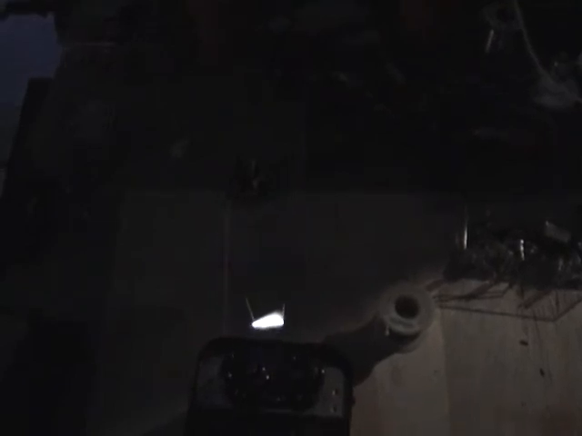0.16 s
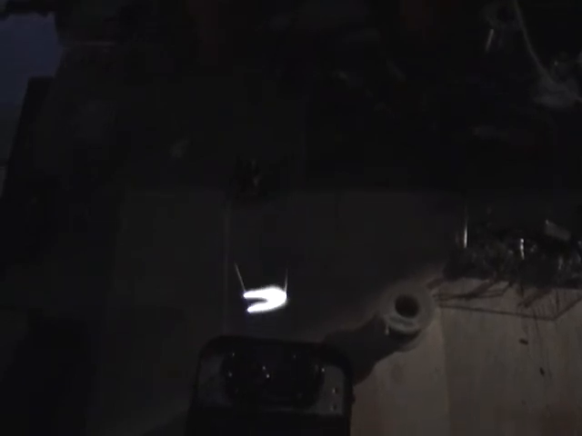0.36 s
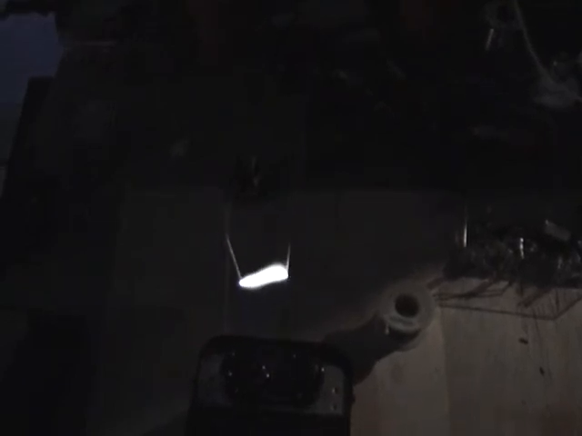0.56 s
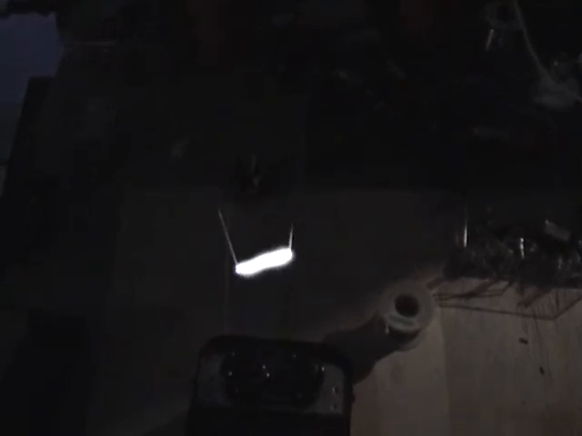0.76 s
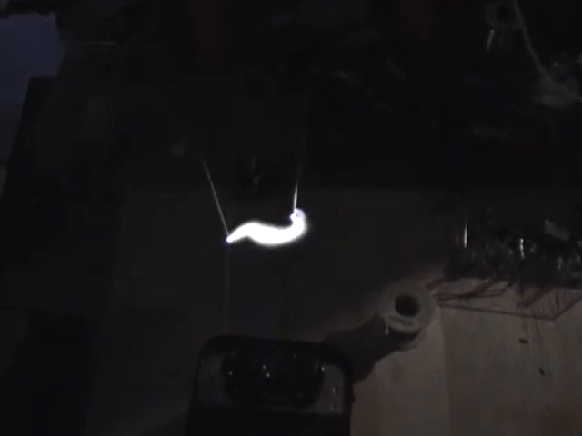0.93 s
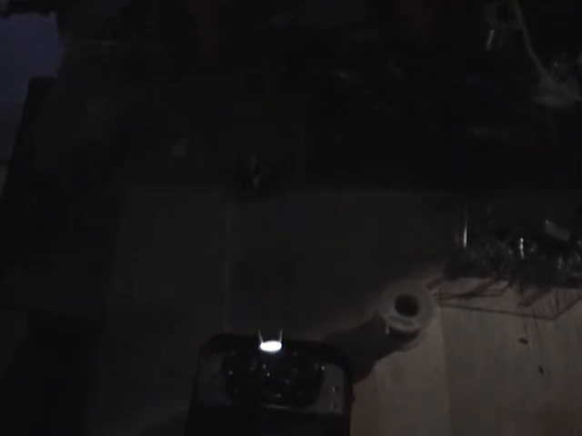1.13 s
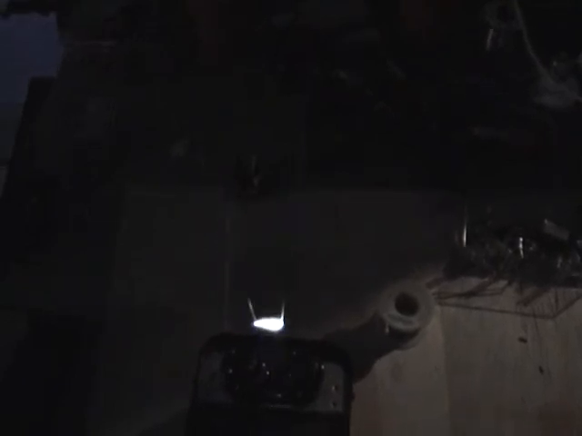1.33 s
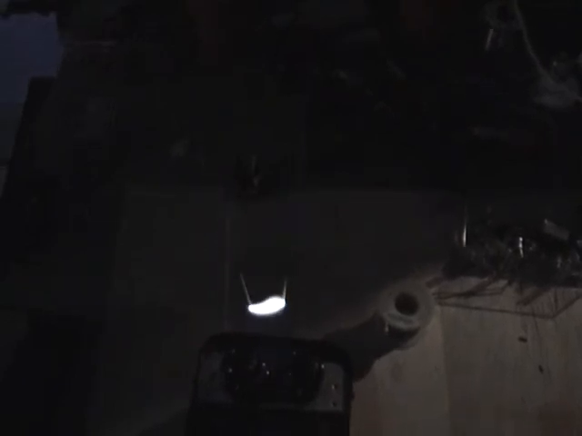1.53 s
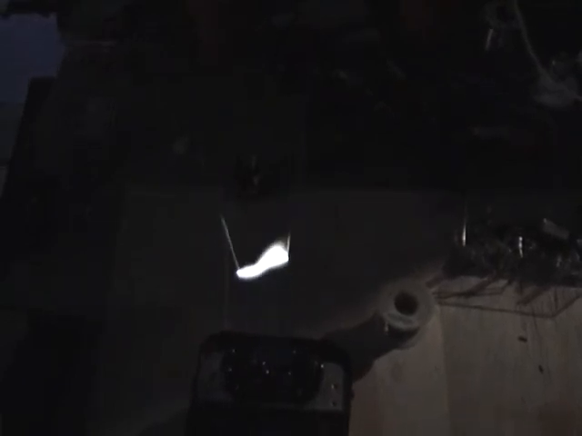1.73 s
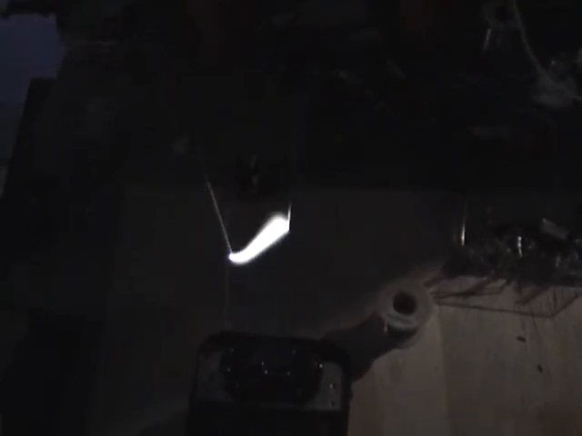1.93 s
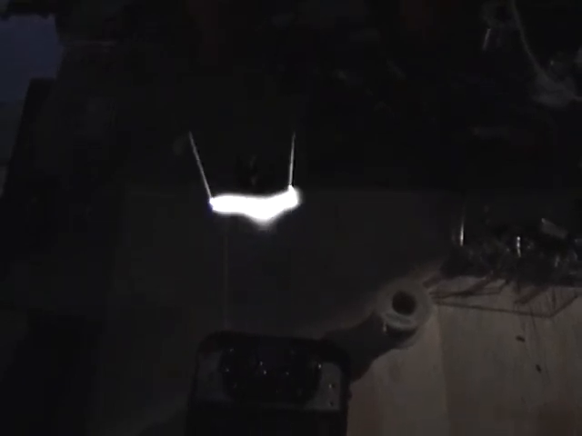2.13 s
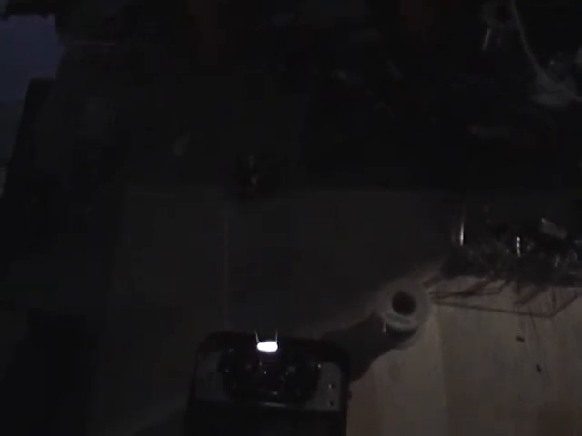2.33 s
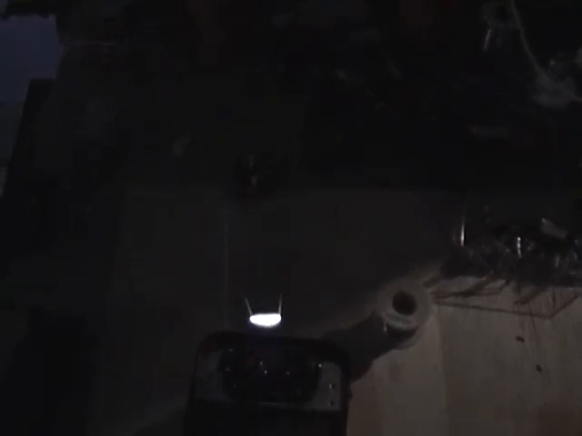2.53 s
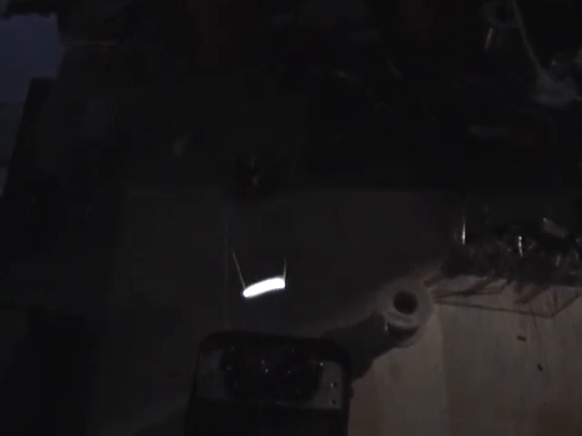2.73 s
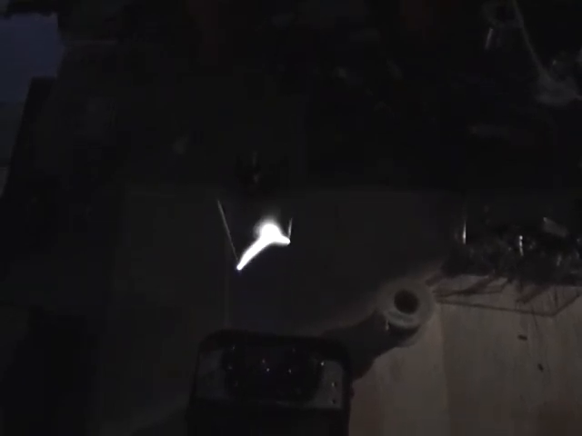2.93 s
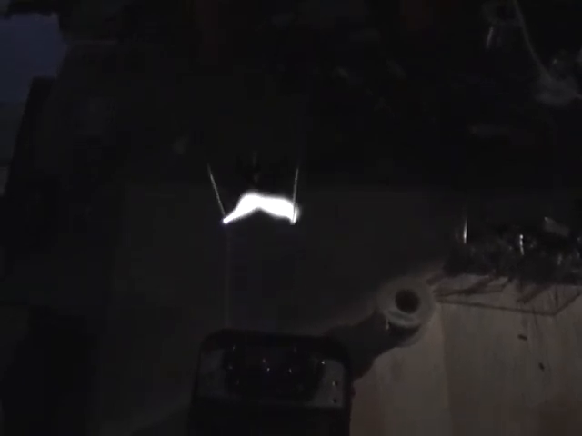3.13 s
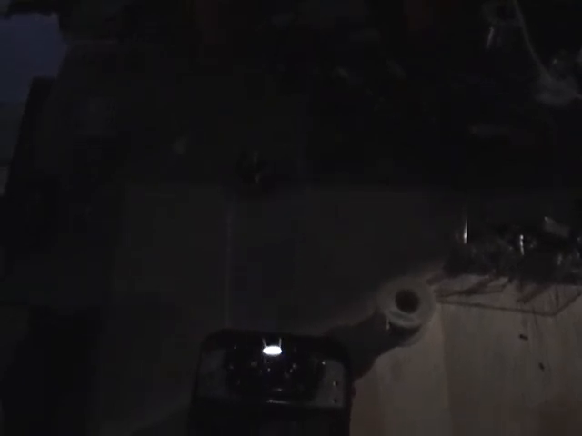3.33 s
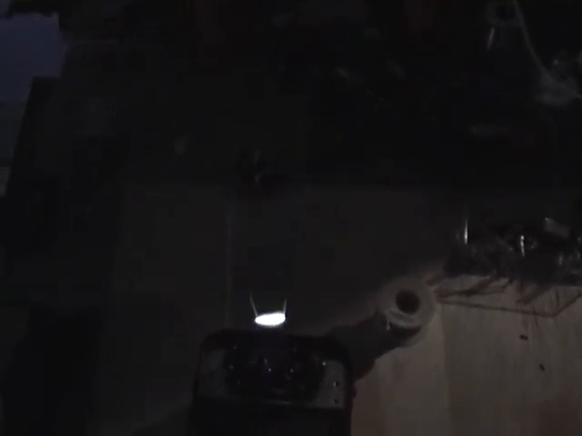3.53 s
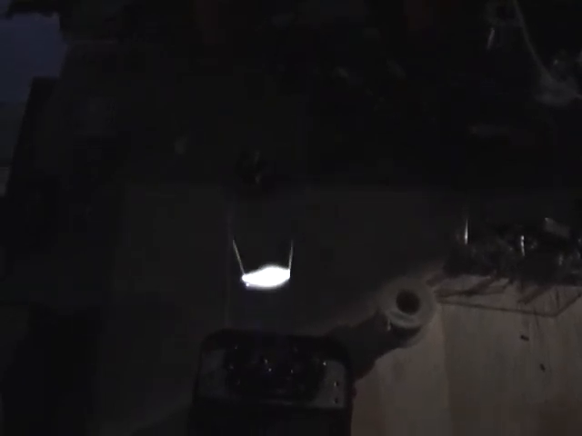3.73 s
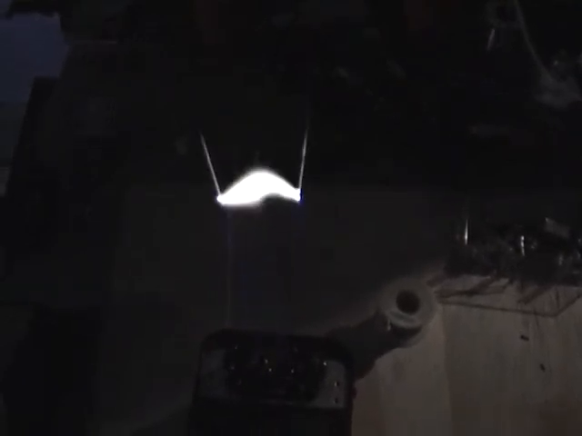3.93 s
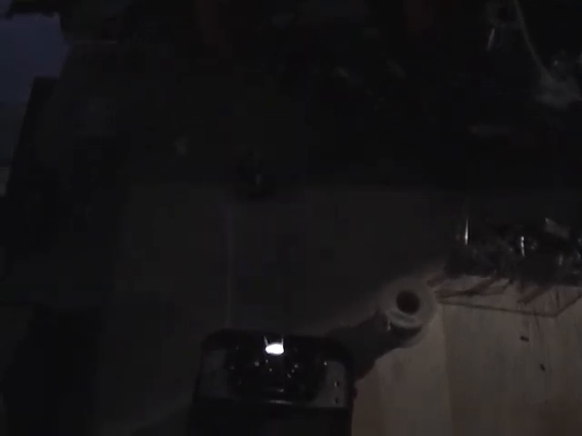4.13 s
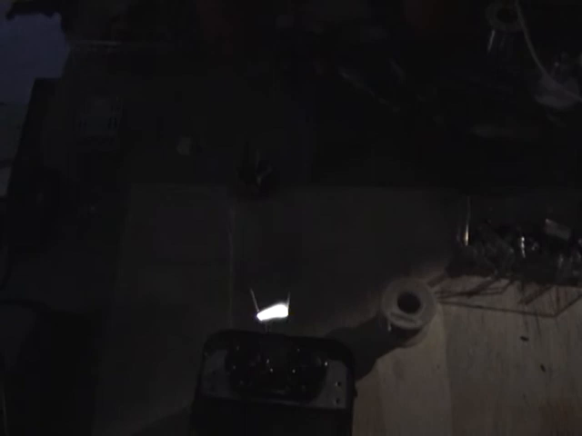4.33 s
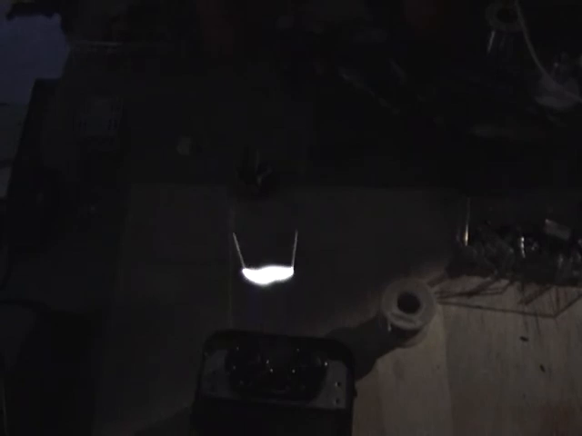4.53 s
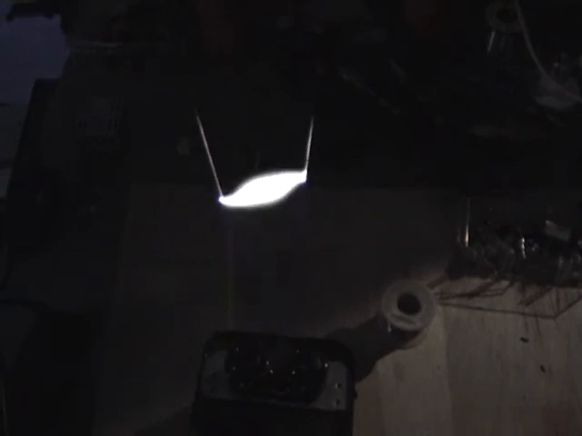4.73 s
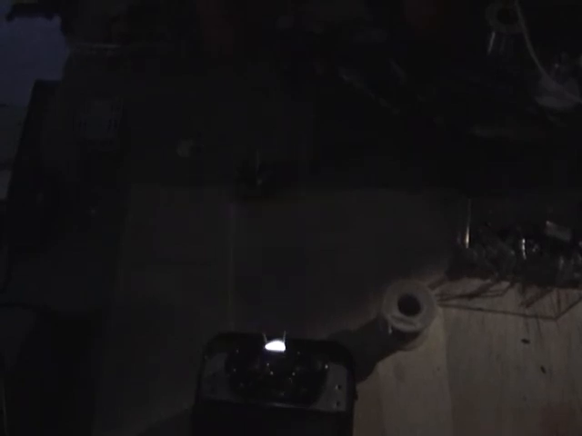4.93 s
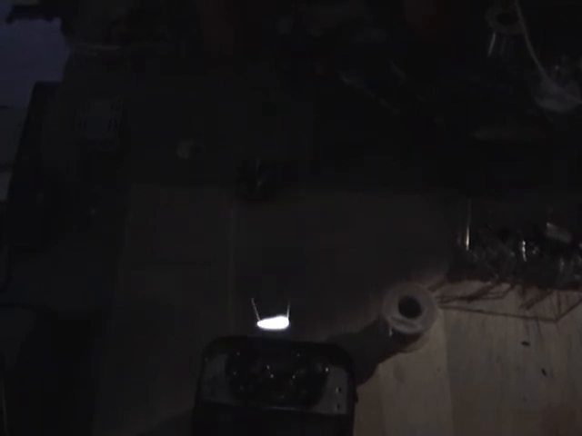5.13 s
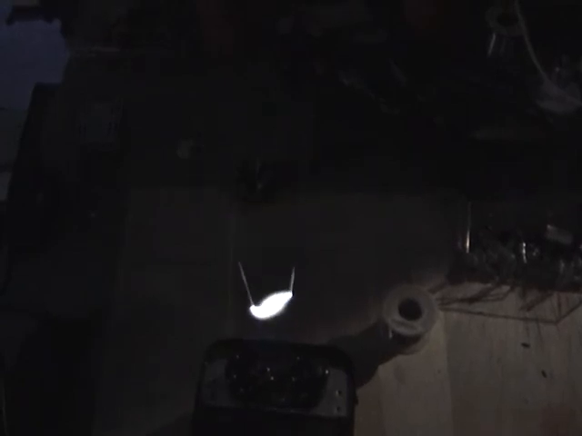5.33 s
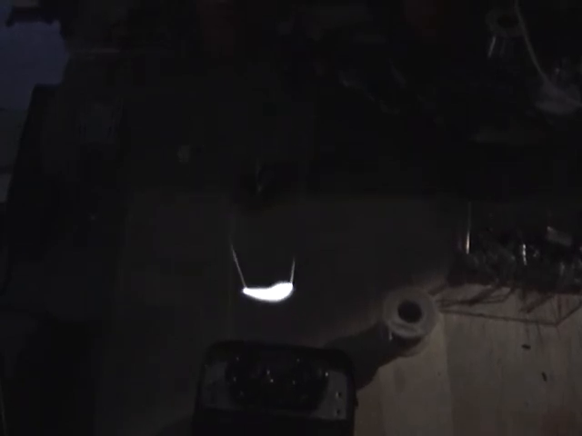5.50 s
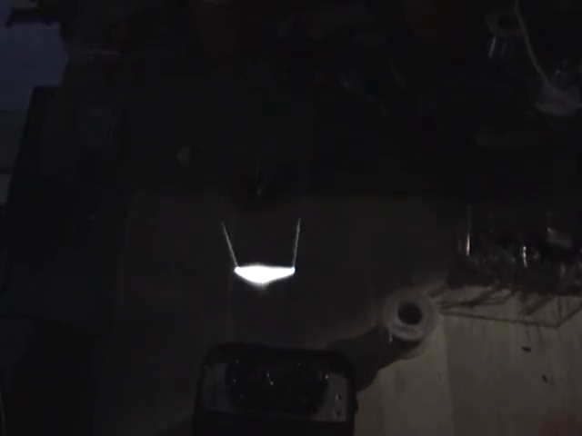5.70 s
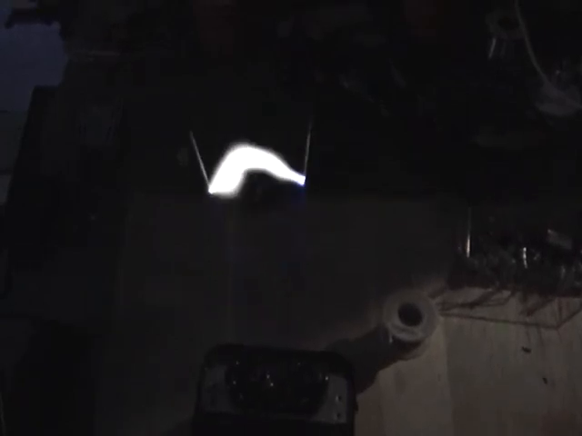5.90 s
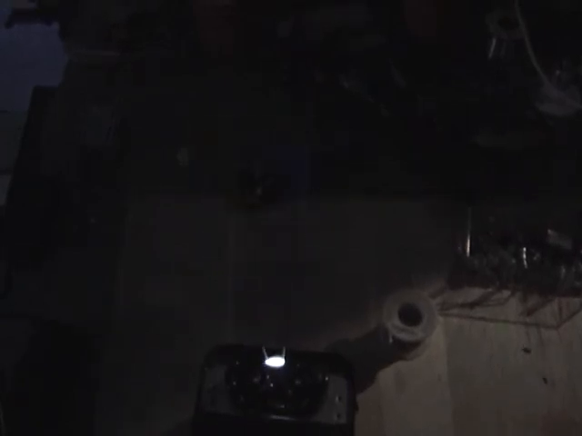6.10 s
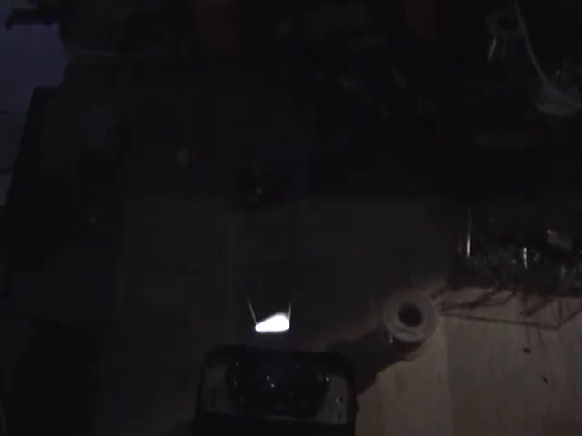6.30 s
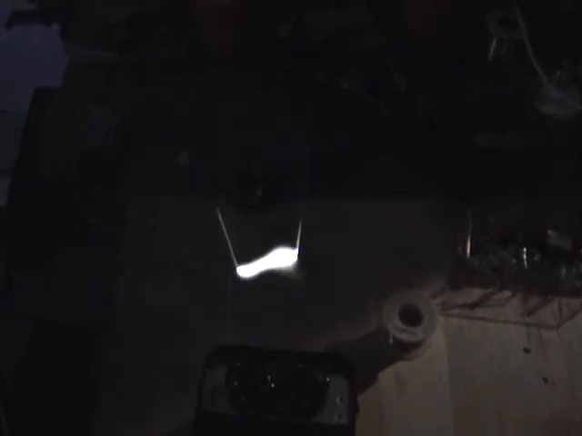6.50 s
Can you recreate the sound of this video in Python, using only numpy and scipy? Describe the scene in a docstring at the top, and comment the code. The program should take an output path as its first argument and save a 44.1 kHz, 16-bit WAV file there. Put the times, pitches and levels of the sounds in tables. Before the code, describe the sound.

Close by in a small, dry-sounding workshop, a transformer hums and a fan softly moves air while an electric arc buzzes up a pair of metal rods. Each climb starts thin and bright, sweeps into a rougher sizzle and ends in a sharp snap as the arc strikes again. The cycle repeats about once a second, with the loudest sputtering cracks midway and near the end.

```python
"""A small workshop, where a mains-fed arc climbs again and again between two diverging rods.
It re-ignites on every half cycle, heating the air in a tiny thunderclap; the echoes off the bench slide
as it rises, so the buzz sweeps. Near the top it flares, tears off and snaps back to the narrow gap.
The transformer hums and air rushes underneath; a gain control ducks everything after loud treble peaks."""
import sys
import numpy as np
from scipy import signal
from scipy.fft import rfft, irfft, next_fast_len
from scipy.io import wavfile
from scipy.ndimage import uniform_filter1d

SR = 44100
rng = np.random.default_rng(int(sys.argv[2]) if len(sys.argv) > 2 else 0)


def master_out(mix):
    """Clip the mix to full scale and print it as 16-bit PCM to the path in sys.argv[1]."""
    frames = np.transpose(np.atleast_2d(mix))
    ceiling = np.clip(frames, -1, 1)
    pcm = np.round(ceiling * 32767).astype(np.int16)
    wavfile.write(sys.argv[1], SR, pcm)


N = 289296
STRIKE_HZ, FIRST_STRIKE_S = 119.988, .00409  # two strikes per mains cycle
SOUND_CM_S = 34300
PULSE_SAMPLES = 512
TIME = np.arange(N) / SR
AGE = np.arange(PULSE_SAMPLES) / SR
BIN_HZ = np.arange(PULSE_SAMPLES // 2 + 1) * SR / PULSE_SAMPLES

# Climbs from the narrow gap: start t/s, snap level/dB, rising speed/(cm/s), recording level/dB
# (buzz and air are turned down together, a little, after some snaps)
CLIMBS = [(-.3, -10, 52.2, -0.5), (0.9439, -14, 60, 0), (2.1611, -10, 64, 0), (3.253, -12.5, 83.7, -1.5),
          (4.0443, -10.5, 83.3, -0.8), (4.777, -10.5, 69, -1.05), (5.9615, -8, 79, -0.5)]


def buzz(sputter_s=.0007, sputter_edge_hz=3200):
    """Thermal expansion: each re-ignition radiates a pressure pulse, more ragged from a longer arc."""
    # Spectrum of one strike: f/Hz, level/dB
    strike_spectrum = [(150, -16), (700, -13.5), (1900, -19), (2600, -11), (3400, -8.5), (4300, -9.5),
                       (5500, -4.5), (6500, -4.5), (7700, 1), (9000, .5), (9900, -3.5), (11500, -7.5),
                       (13000, -10.5), (16000, -18.5)]
    # A short arc cracks higher than a long one: f/Hz, level change/(dB per dB of brightness)
    brightness_tilt = [(1800, 0.35), (2800, -.5), (4000, -0.74), (6300, -0.3), (9000, 0.33), (13000, 0.7)]
    # Single loud cracks of an overstretched arc: t/s, level/dB
    cracks = [(.929, -13), (1.963, -21), (2.129, -16), (2.146, -18), (2.988, -14.5), (3.079, -11.5),
              (3.121, -14), (3.154, -17.5), (5.738, -18), (5.796, -16), (5.896, -14.5), (5.913, -13),
              (5.946, -10)]
    count = int((N / SR - FIRST_STRIKE_S) * STRIKE_HZ) + 1
    times = FIRST_STRIKE_S + np.arange(count) / STRIKE_HZ
    height, gain_db = climb(times)
    height_db, height_bright = arc_timbre(height)
    flare_db, flare_bright = flaring(times)
    flicker_db = (.06 + .0272 * height + .12 * flare_db) * rng.standard_normal(count)
    level_db = height_db + gain_db + flare_db + flicker_db
    ragged_db = -17 + .22 * height + .77 * flare_db
    for crack_s, crack_db in cracks:
        k = np.argmin(abs(times - crack_s))
        level_db[k], ragged_db[k] = crack_db, 2
    wander_cm = (.1 + .024 * height) * rng.standard_normal(count)
    polarity_cm = .66 * (-1) ** np.arange(count)  # the loud spot changes rod with the polarity
    arrivals = times - (height + wander_cm + polarity_cm) / SOUND_CM_S  # higher is heard sooner
    tilt_db = (height_bright + flare_bright)[:, None] * at_hz(brightness_tilt, BIN_HZ)
    pulse = minimum_phase(at_hz(strike_spectrum, BIN_HZ) + tilt_db)
    high_pass = (BIN_HZ / (BIN_HZ - 1j * sputter_edge_hz)) ** 2
    channel = 1 + from_db(ragged_db)[:, None] * sputter(sputter_s, count) * high_pass
    return pulse_train(pulse * channel * bench_echoes(height), arrivals, level_db)


def snaps(spark_s=.0011, spark_db=-2):
    """Dielectric breakdown: the full voltage jumps the narrow gap with a sharp front and a short spark."""
    # Spectrum of one snap: f/Hz, level/dB
    snap_spectrum = [(150, 1), (1100, -4), (3000, -4.5), (5000, -1), (7300, 7), (10500, -1), (13000, -5),
                     (16000, -27)]
    times, level_db = np.transpose([row[:2] for row in CLIMBS if row[0] > 0])
    front = minimum_phase(at_hz(snap_spectrum, BIN_HZ))
    spark = 1 + from_db(spark_db) * sputter(spark_s, len(times))
    return pulse_train(front * spark * bench_echoes(np.zeros(len(times))), times, level_db)


def climb(t):
    """Buoyancy: hot air lifts the arc, except where it lingers. Gives height/cm, recording level/dB."""
    # The arc lingers on the rods: middle t/s, half duration/s, fraction of speed lost
    stalls = [(.568, 0.14, 0.8), (1.788, .24, .74), (2.938, 0.192, .56), (5.527, 0.29, 0.57)]
    start, _, speed, gain_db = np.transpose(CLIMBS)
    k = np.maximum(np.searchsorted(start, t) - 1, 0)
    lost_s = sum(share * half * (np.tanh((t - middle) / half) - np.tanh((start[k] - middle) / half))
                 for middle, half, share in stalls)
    return np.maximum(speed[k] * (t - start[k] - lost_s), 0), gain_db[k]


def arc_timbre(height):
    """Source size: the arc lengthens as it rises, which changes its level and dulls its crack."""
    # The arc along the rods: height/cm, level/dB, brightness/dB
    arc_profile = [(0, -36, 15), (4, -29, 9), (12.1, -26.5, 11), (17.2, -24.5, 7), (20, -29, 1),
                   (35, -28.5, -1.5), (43.6, -27, -4.5), (51.5, -24.5, -4), (62, -25, -7)]
    cm, level_db, bright_db = np.transpose(arc_profile)
    return np.interp(height, cm, level_db), np.interp(height, cm, bright_db)


def flaring(t):
    """Amplitude modulation: the arc bows out and roars in flares that swell, hold and die."""
    # Flares: middle t/s, half duration/s, added level/dB, added brightness/dB
    flares = [(0.5, .015, 3, 0), (.61, 0.019, 2.5, -2), (0.886, 0.056, 1.5, -2.5), (1.883, 0.023, 3, -1),
              (2, 0.032, 1, 3.5), (2.096, 0.045, 2.5, 4), (2.918, 0.031, 7, -2), (3.053, 0.084, 10, 6),
              (3.236, .02, 5, -3.5), (3.91, 0.036, 1.5, 2), (4.567, 0.021, 6, 7), (4.782, 0.016, 6.5, -5),
              (5.338, 0.022, 3.5, -3), (5.611, 0.021, 5, -4), (5.826, 0.08, 6, 3.5)]
    middle, half, level_db, bright_db = np.transpose(flares)
    envelope = np.exp(-((t[:, None] - middle) / half) ** 4)
    return envelope @ level_db, envelope @ bright_db


def sputter(length_s, count):
    """Path differences along a crooked channel spread its sound in time: unit-energy burst spectra."""
    bursts = rng.standard_normal((count, PULSE_SAMPLES)) * np.exp(-(AGE / length_s) ** 2)
    return rfft(bursts / np.sqrt(np.sum(bursts ** 2, axis=1, keepdims=True)))


def minimum_phase(level_db):
    """Causality: a spectrum with these levels, phased so that nothing sounds before the strike."""
    cepstrum = irfft(np.log(from_db(level_db)))
    fold = 1 + np.sign(PULSE_SAMPLES / 2 - np.arange(PULSE_SAMPLES)) * (AGE > 0)
    return np.exp(rfft(cepstrum * fold))


def pulse_train(spectra, times, level_db):
    """Superposition of stereo pulses; each level is the rms over one half cycle."""
    start = np.floor(times * SR).astype(int)
    waves = irfft(spectra * np.exp(-2j * np.pi * BIN_HZ * (times - start / SR)[:, None]))
    energy = np.sum(waves.mean(axis=0) ** 2, axis=1)
    waves = waves * (from_db(level_db) * np.sqrt(SR / STRIKE_HZ / energy))[:, None]
    samples = np.maximum(start[:, None] + np.arange(PULSE_SAMPLES), 0).ravel()
    return np.array([np.bincount(samples, side.ravel(), N)[:N] for side in waves])


def bench_echoes(height, side_lag_s=2.2e-6):
    """Comb filtering: direct sound interferes with echoes whose delays grow as the arc rises."""
    # Nearby surfaces: delay at the gap/ms, path growth/(cm/cm), signed strength,
    # fading height/cm, lower edge f/Hz
    reflectors = [(.272, .745, 1.05, 18.5, 3800), (.163, 0.22, .3, 18, 8760),
                  (.367, 0.716, -0.19, 26, 2200), (.438, 0.291, 0.23, 120, 600),
                  (.583, 0.73, 0.33, 31.5, 600), (.761, 0.29, .14, 120, 600), (.968, 0.924, 0.29, 63, 600),
                  (.996, 0.28, -0.036, 120, 600), (2.394, 1.231, -0.24, 76, 600)]
    paths = np.ones((2, len(height), len(BIN_HZ)), complex)
    for k, (gap_ms, slide, strength, reach_cm, edge_hz) in enumerate(reflectors):
        delay = detour_s(gap_ms, slide, height)
        lag = (-1) ** k * side_lag_s * np.array([1, -1])
        gain = strength / np.sqrt(1 + (height / reach_cm) ** 8)
        treble = BIN_HZ ** 2 / np.hypot(BIN_HZ ** 2, edge_hz ** 2)  # small surfaces mirror short waves
        echo = gain[:, None] * treble * np.exp(-2j * np.pi * BIN_HZ * delay[:, None])
        paths += echo * np.exp(-2j * np.pi * BIN_HZ * lag[:, None, None])
    return paths + clutter(height)


def clutter(height, level_db=-12, spread_ms=1.5, edge_hz=3000, width=.62, count=20):
    """Scattering: small things near the bench return weak treble echoes that slide with the arc."""
    paths = 0
    for late, slide, sign, pan in rng.random((count, 4)):
        gap_ms = .8 - spread_ms * np.log(1 - .95 * late)
        delay = detour_s(gap_ms, .4 + .9 * slide, height)
        gains = np.sign(sign - .5) * (1 + width * np.sign(pan - .5) * np.array([1, -1]))
        paths = paths + gains[:, None, None] * np.exp(-2j * np.pi * BIN_HZ * delay[:, None])
    return from_db(level_db) / np.sqrt(count) * paths * BIN_HZ / (BIN_HZ - 1j * edge_hz)


def detour_s(gap_ms, slide, height):
    """Path difference: an echo's delay is nearly constant for a low arc, then grows with height."""
    return np.hypot(gap_ms / 1000, slide * height / SOUND_CM_S)


def reverberation(x, t60_s=.088, onset_s=.004):
    """Diffuse reflection: the sound of a crowded room decays quickly and exponentially."""
    t = TIME[:SR // 3]
    tail = unit_rms(stereo_noise(len(t), side_db=-3) * from_db(-60 * t / t60_s) * (t > onset_s))
    wet = signal.fftconvolve(x, from_db(-14) * tail / np.sqrt(len(t)), axes=1)[:, :N]
    return coloured(wet, [(1000, 10.5), (2500, -12), (4000, 8.0), (8000, 0.5), (15000, -3.0)])


def transformer_hum(load_db=5, load_cm=18):
    """Forced vibration: the core hums at harmonics of the strike rate, hardest under a short arc."""
    # Core harmonics: multiple of the strike rate, level before loading/dB
    harmonics = [(1, -50), (2, -51.5), (3, -56.5), (4, -53), (5, -55), (6, -54), (7, -54), (8, -69)]
    height, _ = climb(TIME)
    tones = 0
    for multiple, level_db in harmonics:
        amplitude = from_db(level_db + drift(7))
        tones += amplitude * np.sin(2 * np.pi * (round(multiple) * STRIKE_HZ * TIME + rng.random()))
    return from_db(load_db * np.exp(-height / load_cm)) * tones


def air_rush(level_db=-33.5, waver_db=1.03, fan_db=-.5):
    """Flow noise: broadband air, turned down with the buzz after some snaps, and a fan's wavering tones."""
    # Spectrum of the rushing air: f/Hz, relative level/dB
    air_spectrum = [(20, -19), (70, -22), (130, -7.5), (160, -12.5), (230, -2.5), (310, -2.5), (430, -3),
                    (580, -8), (850, -12), (1250, -9), (1900, -19), (4000, -21), (9000, -22),
                    (16000, -27.5)]
    # Tones of the fan: f/Hz, relative level/dB
    fan_tones = [(42.4, -61), (50, -60), (99.8, -53), (183.5, -49), (220.7, -58), (305, -42.5), (396, -43)]
    _, gain_db = climb(TIME)
    air = unit_rms(coloured(stereo_noise(N, side_db=-15), air_spectrum))
    fan = sum(from_db(db) * np.sin(2 * np.pi * hz * TIME + .9 * drift(7)) for hz, db in fan_tones)
    air_db = level_db + .84 * gain_db + waver_db * drift(12)
    return from_db(air_db) * air + from_db(fan_db) * fan


def rumble(level_db=-61):
    """Low-pass noise: a faint rumble, uncorrelated between the two sides."""
    spectrum = [(10, -14), (30, -6), (60, -6), (140, 1), (400, -31), (2000, -60)]  # f/Hz, level/dB
    return from_db(level_db) * unit_rms(coloured(rng.standard_normal((2, N)), spectrum))


def gain_control(x, threshold_db=-20.5, sense_hz=8000, release_s=.14, slope=.84):
    """Compression: treble above a threshold turns the gain down at once; it creeps back afterwards."""
    treble = signal.sosfilt(signal.butter(2, sense_hz, "high", fs=SR, output="sos"), x.mean(axis=0))
    level_db = 10 * np.log10(np.abs(uniform_filter1d(treble ** 2, size=132)) + 1e-12)
    over_db = np.maximum(level_db - threshold_db, 1e-6)
    decay = TIME / release_s
    held_db = np.exp(np.maximum.accumulate(np.log(over_db) + decay) - decay)
    return x * from_db(-slope * uniform_filter1d(held_db, size=44))


def from_db(db):
    """Amplitude ratio of a level."""
    return 10 ** (np.asarray(db) / 20)


def unit_rms(x):
    """Normalisation to unit power."""
    return x / np.sqrt(np.mean(x ** 2) + 1e-20)


def at_hz(points, hz):
    """Interpolation of a spectrum on a log-frequency axis."""
    f, value = np.transpose(points)
    return np.interp(np.log(np.maximum(hz, 1)), np.log(f), value)


def coloured(x, points):
    """Zero-phase filtering by points of f/Hz, level/dB."""
    size = next_fast_len(x.shape[-1])
    gain = from_db(at_hz(points, np.fft.rfftfreq(size, 1 / SR)))
    return irfft(rfft(x, size) * gain, size)[..., :x.shape[-1]]


def drift(rate_hz):
    """Slow random modulation: straight lines between Gaussian values."""
    knots = rng.standard_normal(2048)
    return np.interp(TIME * rate_hz, np.arange(len(knots)), knots)


def stereo_noise(length, side_db):
    """Partial coherence: noise common to both sides plus a weaker part in antiphase."""
    mid, side = rng.standard_normal((2, length))
    return mid + from_db(side_db) * side * [[1], [-1]]


def scene(arc_gain_db=1.12):
    """Superposition of the arc and its reverberation over air, hum and rumble."""
    arc = from_db(arc_gain_db) * (buzz() + snaps())
    floor = rumble()
    return arc + reverberation(arc) + air_rush() + transformer_hum() + floor


def record(dry, cutoff_hz=16000):
    """Transduction: two ports differ in level and phase; ducking, saturation and a low-pass follow."""
    # Left port minus right: f/Hz, level/dB
    port_balance = [(30, -2.5), (60, -15), (110, 2), (200, 1.5), (380, 3.0), (700, 3), (1290, -0.5),
                    (2380, 0), (4400, -1), (8120, -0.5), (15000, 2)]
    # Lead of the left port: f/Hz, phase/rad
    port_lead = [(0, 1), (260, 0.29), (1290, -0.67), (1980, 0.33), (5000, 0.55), (6120, 0.13), (8100, 0.66),
                 (9910, 0.77), (11400, 0.41), (16500, -0.17)]
    size = next_fast_len(N)
    hz = np.fft.rfftfreq(size, 1 / SR)
    half = np.array([[1], [-1]]) / 2
    lead = np.interp(hz, *np.transpose(port_lead))
    ports = from_db(half * at_hz(port_balance, hz)) * np.exp(1j * half * lead)
    ducked = gain_control(irfft(rfft(dry, size) * ports, size)[:, :N])
    low_pass = signal.firwin(255, cutoff_hz, fs=SR)
    return signal.fftconvolve(np.tanh(ducked), low_pass[None], "same", axes=1)


dry = scene()
out = record(dry)
master_out(out)
```